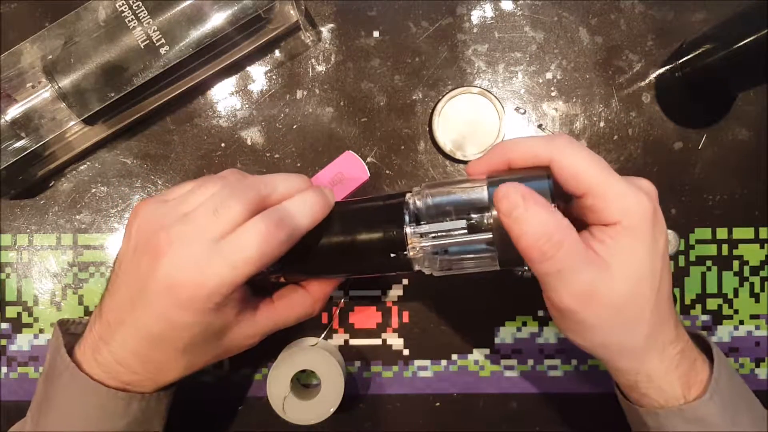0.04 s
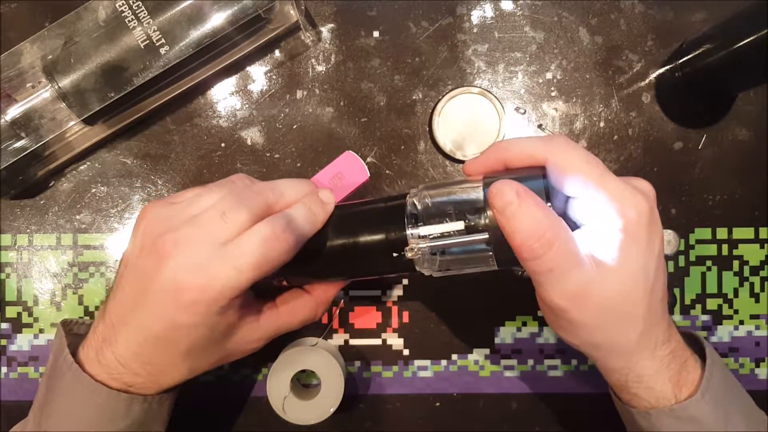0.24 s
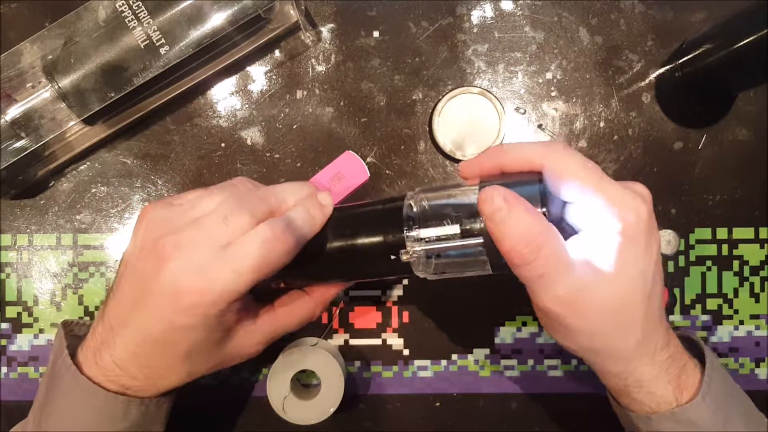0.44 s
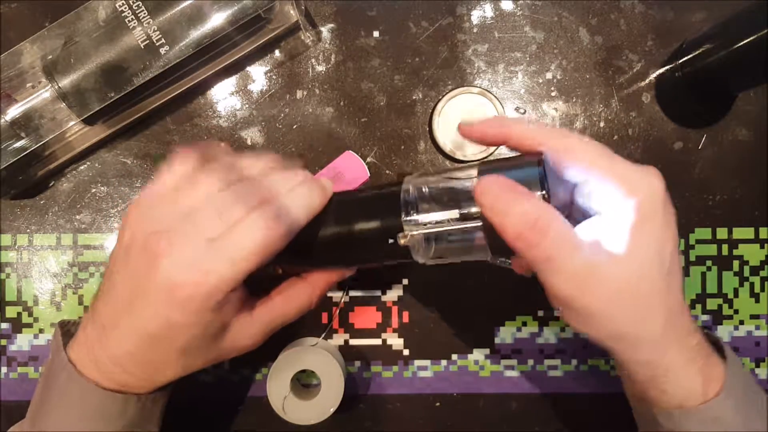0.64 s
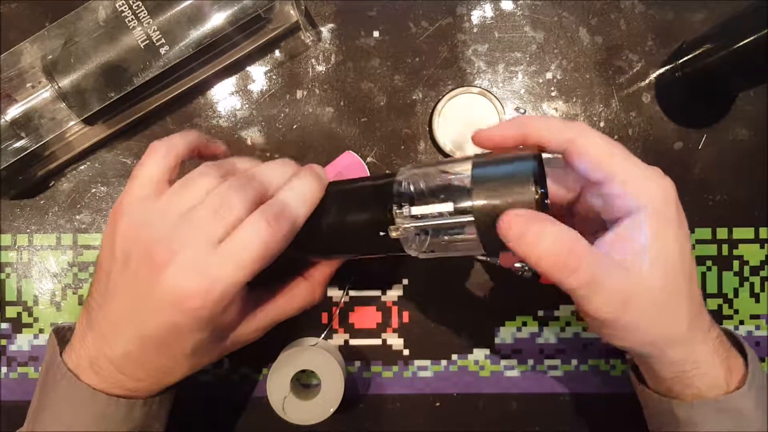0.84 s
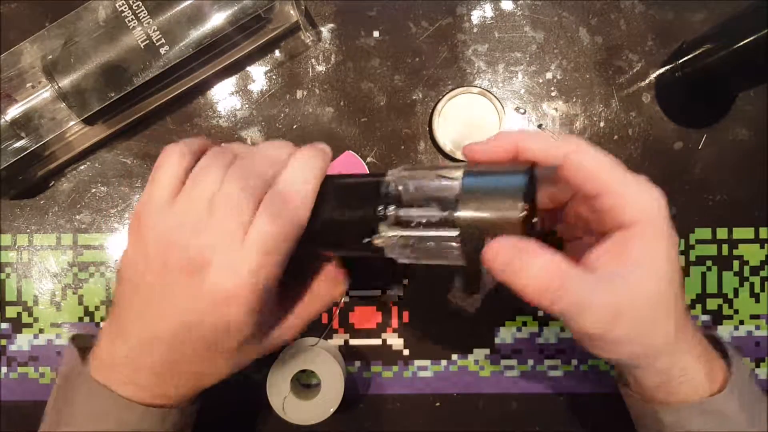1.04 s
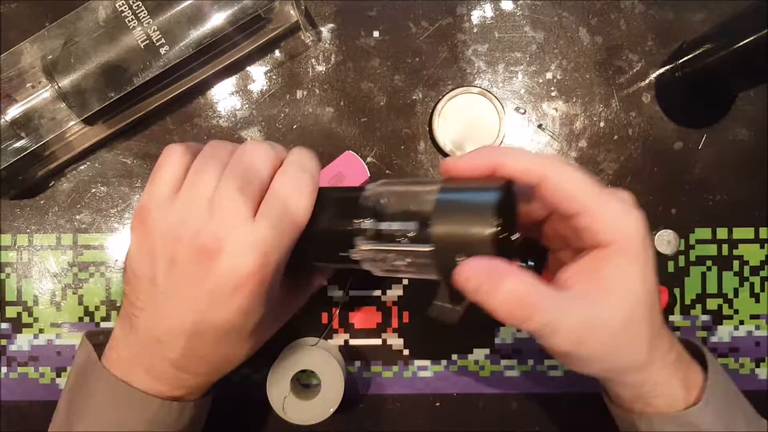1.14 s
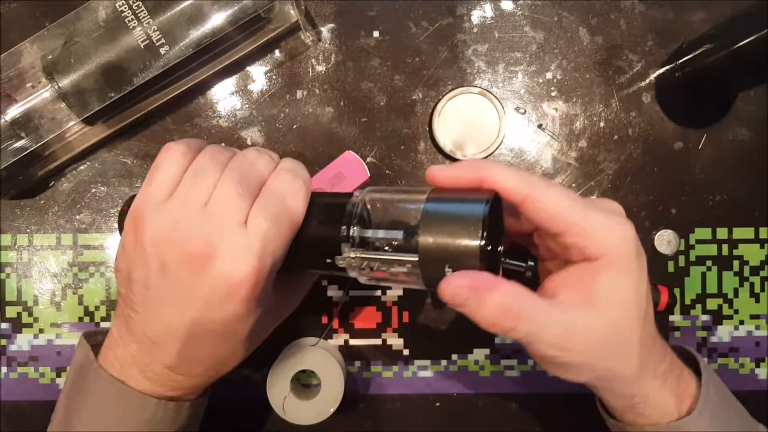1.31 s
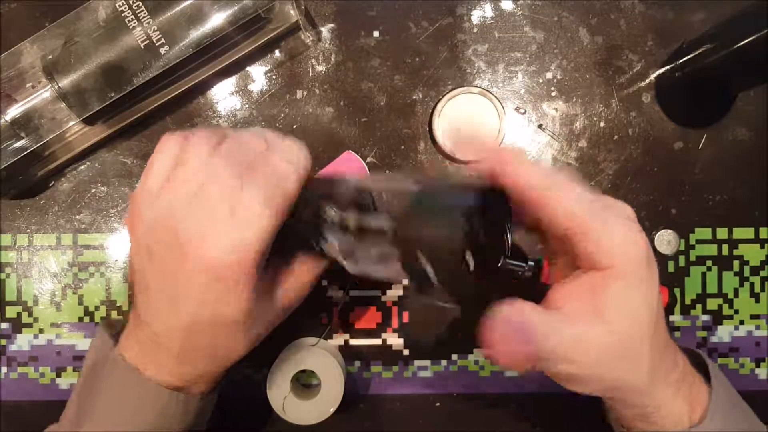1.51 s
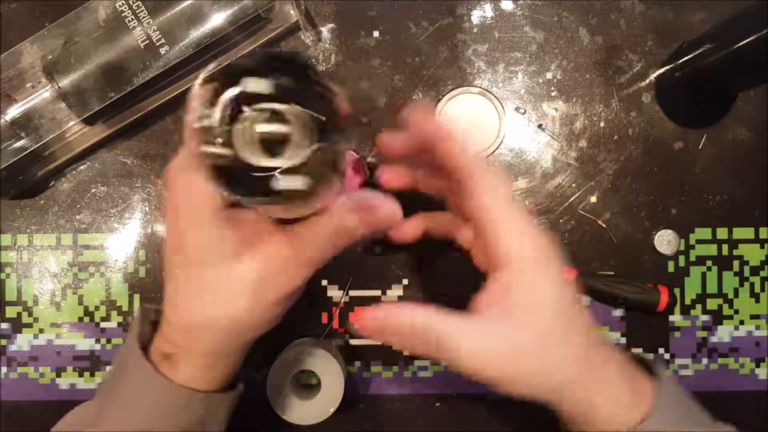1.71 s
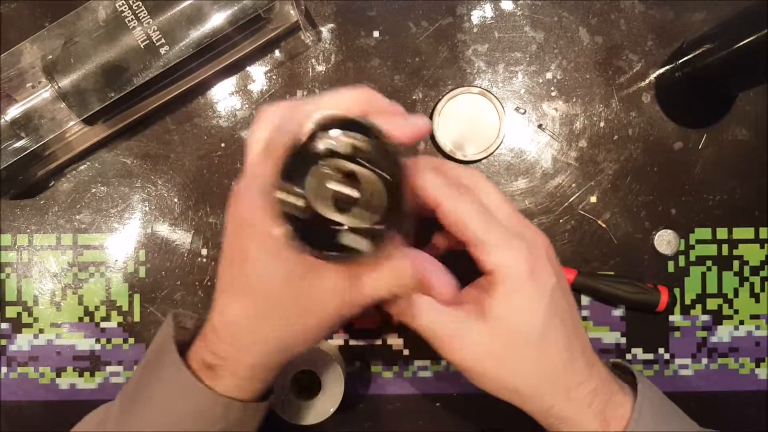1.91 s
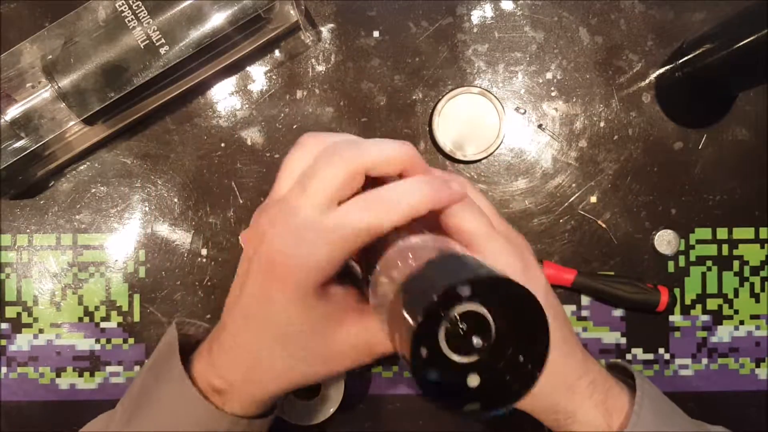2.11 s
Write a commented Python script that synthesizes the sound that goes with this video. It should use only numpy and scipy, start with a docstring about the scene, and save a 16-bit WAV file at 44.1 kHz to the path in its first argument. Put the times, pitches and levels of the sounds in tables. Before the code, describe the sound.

A small electric pepper mill clicks on and whirs with a high, rising whine and plastic rattle, then winds down. A light knock and faint finger rubbing follow, close by in a quietly humming room.

```python
"""A battery pepper mill is held over a table in a small, humming room. First its switch clicks.
The motor spins up: the gear teeth meet so fast that they whine, and they rattle the plastic housing.
From about 0.7 s it slows, and by 1.25 s it has stopped with a thin squeak from the shaft.
Then the mill knocks as it shifts in the hand, and last the fingers rub softly as they turn it over."""
import sys
import numpy as np
from scipy import signal
from scipy.fft import rfft, irfft
from scipy.io import wavfile

SR = 44100
rng = np.random.default_rng(int(sys.argv[2]) if len(sys.argv) > 2 else 0)


def digitize_waveform(pressure):
    """Quantize a signal to 16-bit integers and store it at the path in sys.argv[1].

    Rows of a 2-D input are taken as channels; values are limited to [-1, 1].
    """
    field = np.atleast_2d(pressure).T
    bounded = np.clip(field, -1, 1)
    quanta = np.round(bounded * 32767).astype(np.int16)
    wavfile.write(sys.argv[1], SR, quanta)


N = 94815
T = np.arange(N) / SR
HZ = np.fft.rfftfreq(N, 1 / SR)


# how often the gear teeth meet: t/s, f/Hz
TOOTH_RATE = [(.2, 597.3), (.256, 1807), (.3, 2278), (.346, 2685), (.39, 2837), (.48, 3008), (.594, 3159),
              (.68, 3192), (.724, 2907), (.762, 2579), (.88, 1817), (.95, 1389), (1.02, 1071),
              (1.23, 200.5)]
TEETH = 11

def shaft_turns():
    """Counts the turns of the slightly unsteady motor shaft."""
    tooth_hz = curve(TOOTH_RATE) * (1 + .004 * drift(90))
    return np.cumsum(tooth_hz) / SR / TEETH


# how loud the whine is: t/s, level/dB
WHINE_LEVEL = [(.235, -67), (.258, -35), (.3, -33.5), (.334, -34), (.348, -22), (.39, -22), (.408, -27.5),
               (.49, -29), (.55, -30), (.616, -25.5), (.66, -30.5), (.71, -34.5), (.735, -30.5), (.82, -30),
               (.88, -40.5), (.97, -47), (1.1, -76)]
# fuzzy while speeding up or coasting, clean when the teeth bite evenly: t/s, roughness/0-1
WHINE_ROUGHNESS = [(.27, .5), (.32, .8), (.35, .12), (.39, .2), (.43, .62), (.55, .58), (.62, .35),
                   (.71, .85), (.9, .62)]
# the tones in the whine: cycles per shaft turn, level/dB
WHINE_TONES = [(9, -13), (10, -16), (11, -.5), (12, -15), (33, -12.5)]

def whine(turns):
    """The meeting teeth sing one main tone and weaker ones, which flutter as the gears shift."""
    out = np.zeros((2, N))
    rough = curve(WHINE_ROUGHNESS)
    for cycles, db in WHINE_TONES:
        pitch_ratio = cycles / TEETH
        flutter_hz = 150 * pitch_ratio
        fuzz = np.minimum(rough * pitch_ratio, 1)
        share = 1 if cycles == TEETH else np.sqrt(2 * rough)  # an uneven bite lifts the weaker tones
        wander = (drift(flutter_hz) + 1j * drift(flutter_hz)) / np.sqrt(2)
        flutter = np.sqrt(1 - fuzz ** 2) + fuzz * wander
        for ear in range(2):
            lag = ear * 0.55 * pitch_ratio + 0.37 * drift(24)
            tone = np.exp(1j * (2 * np.pi * cycles * turns - lag))
            out[ear] += amp(db) * share * (flutter * tone).real
    flicker = amp(2.2 * rough * drift(53))
    return shape(out * level(WHINE_LEVEL) * flicker, barrel())


# pitches at which the gears ring the barrel: f/Hz, width/Hz, level/dB
BARREL_PEAKS = [(897, 35, 4.5), (1840, 85, 12), (2730, 80, 4)]

def barrel():
    """The mill's barrel boosts sound near its own pitches; gives a gain for each frequency."""
    return amp(sum(db * peak(hz, width) for hz, width, db in BARREL_PEAKS))


# how loud the rattle is: t/s, middle level/dB, treble level/dB, bass level/dB
RATTLE_LEVELS = [(.205, -55.5, -72, -63), (.23, -38.5, -48, -45.5), (.27, -33.5, -39.5, -54),
                 (.36, -36, -36, -42), (.44, -35, -35, -43), (.55, -36, -39, -45), (.65, -34, -38.5, -48.5),
                 (.685, -33, -34.3, -41), (.735, -32.5, -38.5, -45.5), (.765, -35, -38, -54.5),
                 (.84, -35, -40, -52.5), (.93, -37.5, -46.5, -60.5), (1.02, -38.5, -49.5, -54),
                 (1.13, -43.5, -62, -59.5), (1.26, -67, -79, -61.5)]
# how the housing colours it at each ear: f/Hz, level/dB
LEFT_COLOUR = [(60, -54), (480, -12.5), (750, -17), (920, -8), (1060, -14), (1200, -8), (1420, -20),
               (1850, -2), (2150, -2.5), (2450, -4.5), (2750, -2.5), (3300, -1.5), (4500, -13),
               (5400, -11.5), (7000, -20.5), (8800, -18), (10500, -27.5), (12100, -18), (13300, -26.5),
               (15800, -37)]
RIGHT_COLOUR = [(60, -31), (480, -16.5), (950, -13), (1400, -15.5), (1900, -5), (2400, -7), (2750, 2),
                (3250, -9), (3600, -3), (4300, -10.5), (6000, -15.5), (7400, -23.5), (8800, -11),
                (9500, -15.5), (10300, -17.5), (13000, -27.5), (15800, -30.5)]
# how alike the two ears hear it: f/Hz, likeness/0-1
RATTLE_LIKENESS = [(1200, 0.93), (2400, 0.72), (5000, 0)]

def rattle(turns, full_force_hz=1700, scrape=0.56):
    """Each tooth strikes and scrapes, with softer strikes at low speed; the housing colours the noise."""
    tooth_hz = curve(TOOTH_RATE)
    force = np.minimum(tooth_hz / full_force_hz, 1)
    uneven = amp(1.5 * np.clip(rng.standard_normal((2, N)), -2, 2))
    new_tooth = np.diff(np.floor(turns * TEETH), prepend=0)
    strikes = new_tooth * force * uneven * np.sqrt(SR / tooth_hz)
    wobble = 1 + 0.096 * np.cos(2 * np.pi * turns)
    chatter = amp(1.2 * drift(260))
    grit = rng.standard_normal((2, N))
    contact = (strikes * np.sign(grit) + scrape * grit) * wobble * chatter / np.hypot(force, scrape)
    housing = barrel() * amp([spectrum(LEFT_COLOUR), spectrum(RIGHT_COLOUR)])
    clatter = shape(blend(contact, spectrum(RATTLE_LIKENESS)), housing)
    bass = 1 / (1 + (HZ / 1450) ** 10)
    treble = 1 - 1 / (1 + (HZ / 4600) ** 10)
    bands = enumerate([1 - bass - treble, treble, bass], start=1)
    return sum(unit(shape(clatter, band)) * level(RATTLE_LEVELS, column) for column, band in bands)


# how the squeak swells and fades: t/s, level/dB
SQUEAK_LEVEL = [(.88, -71), (1.0, -58), (1.07, -53.5), (1.14, -66), (1.172, -63), (1.195, -90)]

def squeak(turns):
    """The bearing chirps once a turn as the shaft slows."""
    friction = np.tanh(2 * ring(hz=10540, width=280))
    chirps = 1 + 0.59 * np.cos(2 * np.pi * turns)
    return friction * chirps * level(SQUEAK_LEVEL) * pan(db=-7)


# snaps of switch, gears and body: t/s, level/dB, f/Hz, width/octaves, fade/s, left over right/dB
SNAPS = [(0.032, -55.5, 3500, 0.38, 0.0078, 8), (.153, -44, 1760, 0.5, 0.0034, 4),
         (0.1771, -28.5, 6760, 1.3, 0.005, -1), (0.4982, -20.5, 2930, 0.28, 0.0038, -4),
         (.7265, -23, 2880, 1, .003, 8), (1.767, -48, 1180, 1.23, 0.003, 1),
         (1.812, -45.5, 2500, 1.4, 0.0079, -0.5)]

def clicks(thump_hz=165, thump_db=-42):
    """Plastic snaps in short bursts of noise; the switch also gives a soft thump."""
    out = np.zeros((2, N))
    for start, db, hz, octaves, fade, side_db in SNAPS:
        colour = 1 / (1 + (np.log2((HZ + 1) / hz) / octaves) ** 2 / 2) ** 2
        burst = (T > start) * np.exp(-since(start) / fade)
        out += unit(shape(pair(0.67), colour)) * burst * amp(db) * pan(side_db)
    age = since(0.2)
    thump = np.sin(2 * np.pi * thump_hz * age) * np.exp(-age / 0.015)
    return out + amp(thump_db) * thump


# the switch, the gears catching, the mill shifting in the hand: t/s, level/dB
KNOCK_HITS = [(.178, -44), (0.2247, -36.5), (1.3505, -34)]
# the notes of the knocked body: f/Hz, level/dB, time to fade by 60 dB/s
BODY_NOTES = [(1126, 1, 0.017), (1773, -2, 0.016), (2480, -5, 0.014), (3500, -0.5, 0.0098),
              (5970, -8, 0.008), (8900, -6.5, 0.0054), (10700, -6, 0.0022)]

def knocks(rise_s=0.00014):
    """Each knock rings all the body's notes at once, making a dry, light crack."""
    out = np.zeros(N)
    for start, knock_db in KNOCK_HITS:
        age = since(start)
        onset = amp(knock_db) * np.minimum(age / rise_s, 1)
        for k, (hz, db, fade) in enumerate(BODY_NOTES):
            out += (-1) ** k * onset * amp(db - 60 * age / fade) * np.sin(2 * np.pi * hz * age)
    return out


# short rings: t/s, f/Hz, level/dB, time to fade by 60 dB/s
SHORT_RINGS = [(0.223, 970, -42, 0.11), (1.165, 1830, -39, 0.074), (1.812, 4830, -49.5, 0.087)]

def rings():
    """The barrel and a light metal part ring briefly."""
    return sum(ring(hz, width=300) * amp(db - 60 * since(start) / fade) * (T > start)
               for start, hz, db, fade in SHORT_RINGS)


# fingers sliding on the barrel: t/s, level/dB
RUB_LEVEL = [(0, -69), (1.42, -70), (1.56, -62.5), (1.8, -67), (2.15, -67.5)]
# the colour of that rubbing: f/Hz, level/dB
SKIN_COLOUR = [(300, -8), (1200, 3), (4000, -2.5), (8000, -11.5), (11000, -18), (15000, -10)]
# the barrel ringing as it is turned: t/s, level/dB
TURN_LEVEL = [(1.9, -79), (1.97, -67.5), (2.08, -60.5), (2.15, -66.5)]
# the pitches it rings at: f/Hz, width/Hz, level/dB
TURN_PEAKS = [(467, 320, 3), (1065, 240, 2.5), (2830, 180, -6), (4500, 600, -16.5), (8600, 370, -16)]

def handling():
    """Skin rubs on the barrel, which rings faintly as it is turned over."""
    rub = unit(shape(pair(0.1), amp(spectrum(SKIN_COLOUR)))) * level(RUB_LEVEL)
    ringing = sum(amp(db) * ring(hz, width) for hz, width, db in TURN_PEAKS) * level(TURN_LEVEL)
    return (rub + ringing) * amp(1.3 * drift(57))


# bounces off the table and hands: delay at the left ear/s, gain
BOUNCES = [(.0013, 0.19), (.0031, .2), (.0054, .2)]

def near_echoes(x):
    """Quick echoes lift some pitches and weaken others, differently at each ear."""
    stretch = np.array([[1], [1.3]])  # longer delays on the right
    echoes = sum(gain * np.exp(-2j * np.pi * HZ * delay * stretch) for delay, gain in BOUNCES)
    return shape(x, 1 + echoes)


def room_echo(x, dull_fade_s=0.31, bright_fade_s=0.18):
    """The room adds a short tail of sound that gets duller as it dies."""
    t = T[:SR // 2]
    noise = rng.standard_normal((2, len(t)))
    dull = unit(signal.lfilter([1], [1, -.75], noise)) * amp(-60 * t / dull_fade_s)
    bright = 2.3 * noise * amp(-60 * t / bright_fade_s)
    tail = (dull + bright) * (t > .003)
    return signal.fftconvolve(x, tail / np.linalg.norm(tail[0]), axes=1)[:, :N]


# the colour of the room's own noise: f/Hz, level/dB
AIR_COLOUR = [(25, -23), (90, -8.5), (135, -8.5), (175, -1.5), (250, -1), (350, -10.5), (630, -13),
              (1100, -17), (2000, -24), (5570, -49.5), (16000, -49)]
# how alike the two ears hear it: f/Hz, likeness/0-1
AIR_LIKENESS = [(130, 0.9), (300, 0.8), (1000, 0)]
# the tones of the hum: f/Hz, level/dB
HUM_TONES = [(107.7, -56), (119.9, -58), (161.5, -60.5)]

def room_tone():
    """A low rumble, a faint hiss and a wavering hum lie under everything."""
    out = amp(-50.5) * unit(shape(pair(spectrum(AIR_LIKENESS)), amp(spectrum(AIR_COLOUR))))
    for hz, db in HUM_TONES:
        waver = 1 + 0.39 * drift(16)
        out += amp(db) * np.sqrt(2) * waver * np.sin(2 * np.pi * hz * T + 0.33 * drift(5.5))
    return out * pan(db=1.2)


def amp(db):
    """Turns decibels into a gain to multiply by."""
    return 10 ** (np.asarray(db) / 20)


def unit(x):
    """Scales a sound to an average strength (rms) of 1."""
    return x / np.sqrt(np.mean(x ** 2) + 1e-20)


def since(start):
    """Seconds since the start, zero before it."""
    return np.maximum(T - start, 0)


def curve(points):
    """Joins a table's points over time."""
    return np.interp(T, *np.transpose(points))


def level(points, column=1):
    """Gain over time from a dB table, silent outside it."""
    rows = np.array(points)
    return amp(np.interp(T, rows[:, 0], rows[:, column], left=-130, right=-130))


def spectrum(points):
    """Joins a table's points over frequency, giving each octave equal space."""
    hz, values = np.transpose(points)
    return np.interp(np.log(HZ + 1), np.log(hz + 1), values)


def shape(x, gain):
    """Turns each frequency up or down by its gain."""
    return irfft(rfft(x) * gain, N)


def drift(hz):
    """Random wander, up to about this fast."""
    return unit(shape(rng.standard_normal(N), 1 / (1 + (HZ / hz) ** 4)))


def pan(db):
    """Gains that put the left ear this many dB above the right."""
    return amp([[db / 2], [-db / 2]])


def blend(noises, likeness):
    """Mixes the left noise into the right to make them partly alike."""
    left, right = noises
    return np.array([left, shape(left, likeness) + shape(right, np.sqrt(1 - likeness ** 2))])


def pair(likeness):
    """Partly alike hiss for the two ears."""
    return blend(rng.standard_normal((2, N)), likeness)


def peak(hz, width):
    """A hump of gain around one pitch."""
    return 1 / (1 + (2 * (HZ - hz) / width) ** 2)


def ring(hz, width):
    """Noise narrowed until it rings near one pitch."""
    return unit(shape(pair(0.6), peak(hz, width)))


def scene():
    """Adds up the motor, the taps, the hands and the room."""
    turns = shaft_turns()
    motor = whine(turns) + near_echoes(rattle(turns)) + squeak(turns)
    taps = clicks() + knocks() + rings()
    echo = room_echo(amp(-11) * motor + amp(-10.5) * taps)
    return motor + taps + echo + handling() + room_tone()


def record(dry):
    """Sound reaches the right microphone a little later, and the very highest treble is cut."""
    lag_s, cut_hz = .00004, 15900
    right = shape(dry[1], np.exp(-2j * np.pi * HZ * lag_s))
    treble_cut = signal.firwin(511, cut_hz, window=("kaiser", 9), fs=SR)
    return signal.oaconvolve(np.array([dry[0], right]), treble_cut[None], "same")


dry = scene()
out = record(dry)
digitize_waveform(out)
```